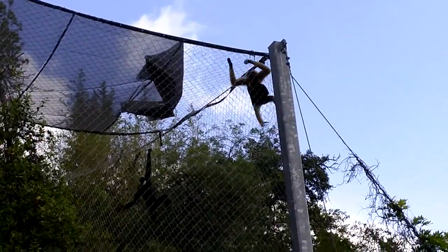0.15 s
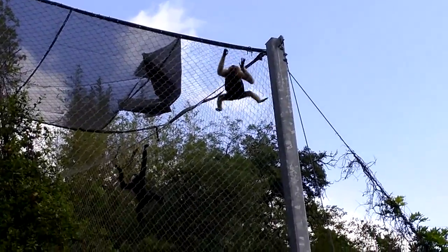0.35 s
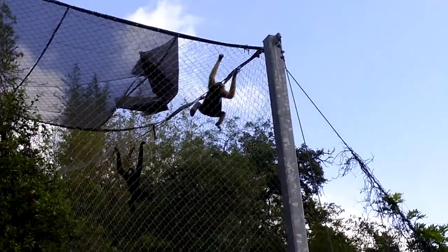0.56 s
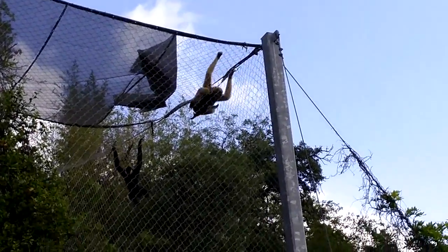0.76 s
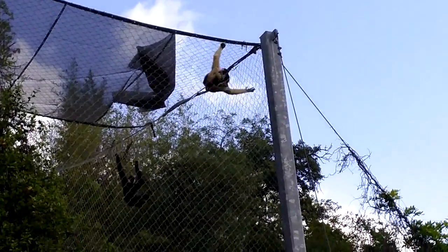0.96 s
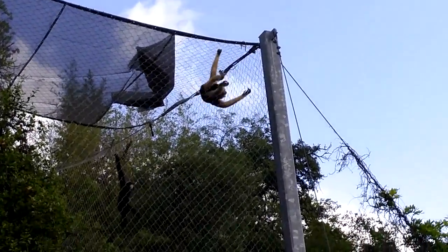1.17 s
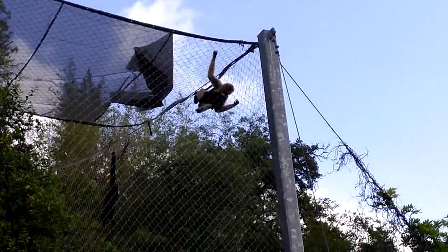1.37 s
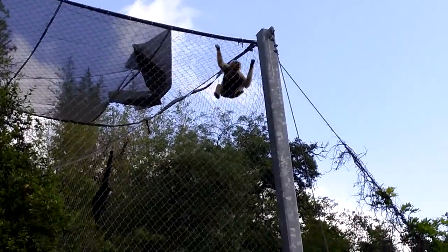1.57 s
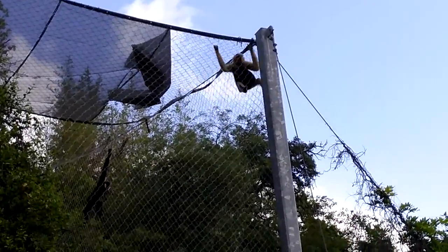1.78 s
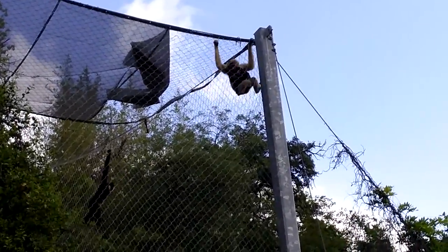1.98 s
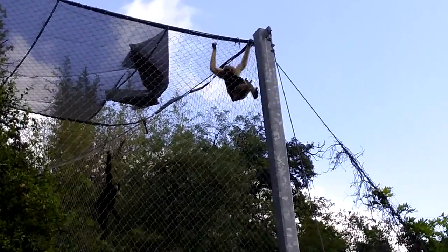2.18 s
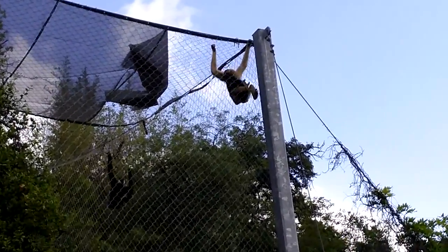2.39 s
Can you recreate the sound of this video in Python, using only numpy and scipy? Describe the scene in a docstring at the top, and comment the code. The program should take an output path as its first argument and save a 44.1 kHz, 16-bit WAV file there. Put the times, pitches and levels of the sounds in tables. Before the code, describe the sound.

Rapid rising gibbon whoops ring through an outdoor netted enclosure, with duller answering calls and soft low hoots between, a dull knock midway, faint air noise, and harsh clipping at the small microphone.

```python
"""Faint air, other gibbons' duller calls and the echo of an earlier whoop open the scene, with a soft low hoot.
From 0.09 s a near gibbon whoops about three times a second in a netted enclosure: gliding harmonics,
mostly rising then dropping, with a strong octave, coloured by throat and nearby surfaces, echoed by trees.
Further hoots are fuzzy sine swells; a pulse makes one dull knock at 1.18 s.
Loud calls overload the small microphone throughout."""
import sys
import numpy as np
from scipy import signal
from scipy.io import wavfile
from scipy.ndimage import uniform_filter1d

SR = 44100
rng = np.random.default_rng(int(sys.argv[2]) if len(sys.argv) > 2 else 0)


def dump_mix(stems):
    """Bounce the given channels to the path in sys.argv[1] as a 16-bit WAV at rate SR."""
    frames = np.atleast_2d(stems).T  # one column per channel
    limited = np.clip(frames, -1, 1)  # hard clip at full scale
    pcm = np.round(limited * 32767).astype(np.int16)
    wavfile.write(sys.argv[1], SR, pcm)


N = 111573

# near gibbon, one table per whoop: time_s, pitch_hz, effort_db, octave_db (relative to fundamental)
WHOOP_1 = [(0.086, 550.7, -18, -22), (0.109, 673.7, -9, -3), (0.161, 856.7, -7, 3), (0.203, 1403, -8, -11),
           (0.231, 1819, -9.5, -2), (0.245, 2272, -8.5, -10), (0.261, 2551, -13, -9.5),
           (0.273, 2286, -13.5, -9), (0.281, 1872, -6, -16), (0.293, 1490, -15, -2)]
WHOOP_2 = [(0.425, 493.3, -39.5, -7), (0.449, 648.7, -13.5, -9.5), (0.462, 709, -18.5, 12.5),
           (0.501, 832.6, -6, -2), (0.513, 928, -14.5, 10.5), (0.539, 1283, -10.5, -4.5),
           (0.58, 1840, -11, -3), (0.603, 2322, -10, -16), (0.618, 1843, -25, 8), (0.632, 1490, -21, -4)]
WHOOP_3 = [(0.77, 559.3, -14, -13.5), (0.801, 701.2, -14, 3), (0.845, 817, -10.5, 3.5),
           (0.876, 1251, -13, 1), (0.896, 1561, -15.5, 2.5), (0.918, 1828, -11, 0), (0.939, 2310, -11, -14),
           (0.954, 2083, -19, 0), (0.965, 1420, -24, -4)]
WHOOP_4 = [(1.09, 561.3, -19, -44), (1.114, 667, -27, 3.5), (1.151, 795, -4.5, 0.5),
           (1.167, 931.5, -12.5, -0.5), (1.199, 1433, -8, -9.5), (1.23, 1988, -15, -12.5),
           (1.241, 2394, -13, -18), (1.252, 2378, -7, -23), (1.264, 1860, -18.5, -6),
           (1.281, 1260, -11.5, -12)]
WHOOP_5 = [(1.405, 570, -24, -10), (1.428, 679, -17.5, 0), (1.471, 802, -6.5, 5), (1.484, 890, -8.5, -2.5),
           (1.528, 1640, -12, -2.5), (1.553, 1867, -6.5, -8.5), (1.569, 1745, -11.5, 0.5),
           (1.587, 1193, -25, 4), (1.599, 966, -15, 1)]
WHOOP_6 = [(1.711, 537.2, -31.5, -4), (1.742, 649.2, -14, -2.5), (1.78, 795, -10, 0),
           (1.81, 1273, -15.5, 1.5), (1.834, 1781, -9, -7), (1.851, 2000, -13, -11.5),
           (1.865, 1714, -13, 1.5), (1.879, 1408, -20.5, 3), (1.89, 1250, -43, -10)]
WHOOP_7 = [(2.03, 560.6, -18, -8.5), (2.1, 786.6, -8.5, 2), (2.118, 941.4, -14.5, 11.5),
           (2.141, 1358, -10.5, -15), (2.169, 1856, -6.5, -7.5), (2.2, 3017, -13.5, -12.5),
           (2.221, 3405, -11.5, -11.5), (2.24, 3127, -13.5, -14.5), (2.257, 1912, -14, -4),
           (2.27, 1510, -16, -9)]
WHOOP_8 = [(2.372, 884.5, -45, -12), (2.403, 760.7, -34, -3), (2.419, 748.4, -11, -4),
           (2.435, 710, -15, 10), (2.452, 793, -6, -8.5), (2.461, 918, -17, -1.5), (2.473, 1172, -13, -7),
           (2.485, 1176, -13, -4), (2.5, 1143, -11.5, 4.5), (2.512, 1297, -4.5, -12.5),
           (2.53, 1657, -5, -30)]
WHOOPS = [WHOOP_1, WHOOP_2, WHOOP_3, WHOOP_4, WHOOP_5, WHOOP_6, WHOOP_7, WHOOP_8]
# lift of harmonics 3 to 8, one per whoop: lift_db
WHOOP_LIFT_DB = [-1.5, 4, 1.5, -6.5, -2, 1.5, 1.5, -1.5]
# gliding lines of the other gibbons' calls, some of them a strong overtone alone: time_s, line_hz, effort_db
ANSWER_LINES = [
    [(0, 1047, -16.5), (.03, 1187, -23), (.06, 1317, -21.5), (.075, 1370, -40)],
    [(.27, 650.3, -42), (.32, 760.5, -20), (.38, 843, -14.5), (.41, 892.5, -14.5), (.44, 1047, -28),
     (.465, 1299, -4.5)],
    [(.665, 529.4, -36), (.69, 668.6, -37.5), (.73, 783, -18.5), (.77, 841, -20.5), (.8, 872, -17),
     (.83, 1059, -37)],
    [(1.075, 697, -34), (1.1, 720.5, -30.5), (1.125, 672, -12)],
    [(1.31, 1906, -27), (1.33, 1872, -23), (1.35, 2130, -20), (1.37, 2085, -39)],
    [(1.57, 801, -30), (1.59, 900, -12.5), (1.61, 940, -18.5)],
    [(1.655, 1048, -21), (1.675, 1471, -17.5), (1.698, 1695, -21), (1.715, 1565, -10), (1.73, 1450, -17.5),
     (1.745, 1614, -8.5), (1.76, 1782, -23)],
    [(1.762, 2840, -20), (1.775, 3242, -20), (1.788, 3343, -38), (1.803, 3180, -7)],
    [(1.945, 567, -7.5), (1.96, 688, -36), (1.978, 701, -33), (1.995, 660, -23), (2.008, 530, -24)],
    [(1.945, 2010, -34), (1.96, 2147, -19), (1.98, 2000, -23)],
    [(1.97, 1307, -28), (1.995, 939, -23), (2.01, 950, -25.5), (2.035, 847, -18.5)],
    [(2.045, 2297, -15), (2.057, 2395, -18), (2.07, 2202, -9)],
    [(2.135, 2562, -16), (2.15, 3156, -10), (2.16, 3210, -12), (2.172, 3080, -26), (2.183, 2700, -21)],
    [(2.455, 1797, -35), (2.468, 2570, -12.5), (2.48, 2700, -19.5), (2.492, 2500, -17)],
]
# harmonics 3 to 8 before lift and flutter: level_db
HIGH_HARMONICS_DB = [-18.5, -22.5, -27, -32, -29, -46]
# colour of throat and nearby reflecting surfaces: frequency_hz, gain_db
COLOUR = [(520, 14), (600, -6.5), (680, 4), (745, -3.5), (840, 1.5), (950, -3.5), (1000, 7.5), (1060, -6.5),
          (1170, 3.5), (1310, -5), (1450, 6.5), (1600, -3), (1740, -6.5), (1930, 3), (2150, -0.5),
          (2500, -4.5), (2700, 2), (3100, 0), (3400, -3), (3700, 2.5), (4020, -2), (4380, -8), (4950, 7.5),
          (6000, 0), (8000, -1.5), (10200, -8), (12000, -30)]
# echo decay: frequency_hz, t60_s
ECHO_T60 = [(500, 0.58), (1000, 0.84), (2000, 0.68), (4000, 0.37), (8000, 0.23)]
# echo spectrum: frequency_hz, gain_db
ECHO_TONE = [(500, -11), (800, -0.5), (1500, -2.5), (2500, 4.5), (4000, 0), (7000, 9), (12000, 2)]
# spectral shape of the outdoor air: frequency_hz, relative_db
AIR_SHAPE = [(15, -49), (25, -11), (529, -32), (755, -0.5), (2090, -9), (2430, -31.5), (3380, -14.5),
             (10900, -33), (14200, -47), (22000, -120)]
# low hoots: start_s, length_s, pitch_hz, level_db
HOOTS = [(0.001, 0.11, 275, -38), (.3, 0.32, 189.4, -41), (1.25, .09, 215, -44), (1.341, 0.078, 291, -39),
         (1.791, 0.11, 256, -35), (1.88, 0.12, 272, -35), (2.28, .07, 350, -43), (2.285, .14, 440, -42),
         (2.3, .1, 250, -43)]

AIR_DB, AIR_PATCH_DB = -31, 2.5
FADE_S = 0.008  # soft start and end of a call
WAVER_SHARE, WAVER_S = 0.0084, 0.0013  # pitch unsteadiness
STEADY_HZ, STRAINED_HZ = 760, 1600  # voice strain grows between these pitches
FLUTTER_DB, FLUTTER_S = 5, 0.0027  # independent per harmonic, at full strain
PATCHY_DB = 2.5  # extra flutter of harmonics 3 and up
FALL_DB, REEDY_DB = -1, 1  # harmonics 3 and up: falling pitch, steady voice
HOARSE_SHARE, HOARSE_S = 0.041, 0.00031
RASP_DB, RASP_HZ = -36.5, 9200  # rushing air: gain, lower edge
FAR_OCTAVE_DB, FAR_DULL_DB = -16, -6
EARLIER_S, EARLIER_DB = 0.33, -1  # lead-in holding a like whoop
ECHO_DB, ECHO_START_S = -6, 0.0087
HOOT_DRIFT_HZ, HOOT_DRIFT_S = 23.6, 0.016
KNOCK_S, KNOCK_DB, KNOCK_RISE_S = 1.181, -15, 0.0003
DRIVE_DB = 2
LIMIT_DB, LIMIT_SHARE, LIMIT_S = -6.5, 0.53, 0.0035  # threshold, share of excess removed, smoothing
KNEE = 8.0  # higher is harder
TREBLE_HZ, TREBLE_CUT_DB = 10730, -9
HISS_DB = -62  # before the band limit
BAND_EDGE_HZ = 15800


def gain_of(db):
    """Amplitude factor of a level in dB."""
    return 10 ** (np.asarray(db) / 20)


def evened(x):
    """Scale to rms 1."""
    return x / np.sqrt(np.mean(x ** 2) + 1e-20)


def read(points, hz):
    """Interpolate a table over log frequency."""
    f, value = np.transpose(points)
    return np.interp(np.log(hz + 1), np.log(f + 1), value)


def chance(seconds, size):
    """Smooth random wander of rms 1: noise averaged twice."""
    width = max(round(seconds * SR), 1)
    once = uniform_filter1d(rng.standard_normal(size), width)
    return evened(uniform_filter1d(once, width))


def add(mix, start_s, sound):
    """Add a sound into the mix in place."""
    part = mix[max(round(start_s * SR), 0):][:len(sound)]
    part += sound[:len(part)]


def air():
    """Faint outdoor noise, shaped in frequency and drifting in time-frequency patches."""
    hz = np.fft.rfftfreq(1024, 1 / SR)
    real, imag, patches = rng.standard_normal((N // 256 + 5, 513, 3)).T
    patches = uniform_filter1d(patches, size=8, axis=0)
    patches = evened(uniform_filter1d(patches, size=14, axis=1))
    level_db = read(AIR_SHAPE, hz)[:, None] + AIR_PATCH_DB * patches
    noise = signal.istft((real + 1j * imag) * gain_of(level_db), nperseg=1024, noverlap=768)[1]
    return gain_of(AIR_DB) * evened(noise[:N])


def call(rows, lift_db=0.0):
    """Gliding harmonic voice; each harmonic flutters and takes the colour of the frequency it passes."""
    time_s, base_hz, effort_db, octave_db = np.transpose(rows)
    t = np.arange(time_s[0], time_s[-1], 1 / SR)

    def smooth(values):
        return uniform_filter1d(np.interp(t, time_s, values), size=200, mode="nearest")

    def wander(seconds):
        return chance(seconds, SR // 2)[:len(t)]

    glide_hz = smooth(base_hz)
    voice_hz = glide_hz * (1 + WAVER_SHARE * wander(WAVER_S))
    phase = 2 * np.pi * np.cumsum(voice_hz) / SR
    strain = np.clip((glide_hz - STEADY_HZ) / (STRAINED_HZ - STEADY_HZ), 0.15, 1)
    falling = uniform_filter1d(1.0 * (np.gradient(glide_hz) < 0), size=300)

    high_shift_db = lift_db + REEDY_DB * (1 - strain) + FALL_DB * falling
    levels_db = [0, smooth(octave_db)] + [db + high_shift_db for db in HIGH_HARMONICS_DB]
    tone = np.zeros(len(t))
    for k, db in enumerate(levels_db, start=1):
        depth_db = FLUTTER_DB * strain + PATCHY_DB * (k > 2)
        flutter_db = depth_db * np.minimum(wander(FLUTTER_S), 1)
        level = gain_of(db + flutter_db + read(COLOUR, k * voice_hz))
        tone -= level * (k * voice_hz < BAND_EDGE_HZ) * np.cos(k * phase)

    tone *= 1 + HOARSE_SHARE * wander(HOARSE_S)
    b, a = signal.butter(2, RASP_HZ, "high", fs=SR)
    rasp = signal.lfilter(b, a, rng.standard_normal(SR // 2))[:len(t)]
    voice = tone + gain_of(RASP_DB) * rasp
    fade = np.clip(np.minimum(t - time_s[0], time_s[-1] - t) / FADE_S, 0, 1)
    return time_s[0], np.sqrt(2) * fade * gain_of(smooth(effort_db)) * voice


def answers():
    """Lines of the other gibbons' calls: each with a fixed weak octave and duller high harmonics."""
    return [call([(*row, FAR_OCTAVE_DB) for row in rows], FAR_DULL_DB) for rows in ANSWER_LINES]


def earlier_whoop():
    """A whoop in the lead-in; only its echo reaches the scene."""
    start_s, sound = call(WHOOP_1)
    return start_s - EARLIER_S, gain_of(EARLIER_DB) * sound


def echoes(x):
    """Sparse random-sign taps from trees and walls; each band decays at its own speed."""
    taps = np.zeros(SR)
    slots = np.arange(0, SR - 20, 20)
    taps[slots + rng.integers(0, 20, len(slots))] = rng.choice([-1.0, 1.0], len(slots))
    tap_s = np.arange(SR) / SR
    taps *= np.clip(tap_s / ECHO_START_S - 1, 0, 1)
    hz, t, z = signal.stft(taps, SR, nperseg=256)
    level_db = read(ECHO_TONE, hz)[:, None] - 60 * t / read(ECHO_T60, hz)[:, None]
    tail = signal.istft(z * gain_of(level_db), SR, nperseg=256)[1]
    tail = tail / np.linalg.norm(taps * gain_of(-60 * tap_s))  # reference: 1 s t60
    return gain_of(ECHO_DB) * signal.fftconvolve(x, tail)[:len(x)]


def hoots():
    """Soft low sines under half-sine swells, made fuzzy by random pitch drift."""
    out = np.zeros(N)
    for start_s, length_s, pitch_hz, level_db in HOOTS:
        t = np.arange(0, length_s, 1 / SR)
        drift_hz = HOOT_DRIFT_HZ * chance(HOOT_DRIFT_S, SR // 2)[:len(t)]
        tone = np.sin(2 * np.pi * np.cumsum(pitch_hz + drift_hz) / SR)
        add(out, start_s, gain_of(level_db) * np.sin(np.pi * t / length_s) * tone)
    return out


def near_whoops():
    """Whoops of the near gibbon, each with its own octave track and brightness."""
    return [call(rows, lift_db) for rows, lift_db in zip(WHOOPS, WHOOP_LIFT_DB)]


def knock():
    """One dull knock near the microphone: a one-sided pulse with exponential decay."""
    out = np.zeros(N)
    u = np.arange(600) / SR / KNOCK_RISE_S
    add(out, KNOCK_S, gain_of(KNOCK_DB) * u * np.exp(1 - u))
    return out


def scene():
    """Voices and their echoes, then air, hoots and knock; the lead-in is cut off."""
    lead = round(EARLIER_S * SR)
    voices = np.zeros(lead + N)
    for start_s, sound in answers() + [earlier_whoop()] + near_whoops():
        add(voices, start_s + EARLIER_S, sound)
    outdoors = (voices + echoes(voices))[lead:]
    return (outdoors + air() + hoots() + knock())[None]


def record(dry):
    """Quick limiter, overload at a fairly hard knee, treble loss, hiss, band limit."""
    x = dry * gain_of(DRIVE_DB)
    power = abs(uniform_filter1d(x ** 2, max(round(LIMIT_S * SR), 1)))
    power_db = 10 * np.log10(power + 1e-12)
    x = x / gain_of(LIMIT_SHARE * np.maximum(power_db - LIMIT_DB, 0))
    clipped = x / (1 + abs(x) ** KNEE) ** (1 / KNEE)
    low_pass = signal.firwin(63, TREBLE_HZ, fs=SR)[None]
    treble = clipped - signal.oaconvolve(clipped, low_pass, "same")
    dulled = clipped - (1 - gain_of(TREBLE_CUT_DB)) * treble
    hissy = dulled + gain_of(HISS_DB) * rng.standard_normal(dry.shape)
    band_limit = signal.firwin(511, BAND_EDGE_HZ, window=("kaiser", 9), fs=SR)[None]
    return signal.oaconvolve(hissy, band_limit, "same")


dry = scene()
out = record(dry)
dump_mix(out)
```